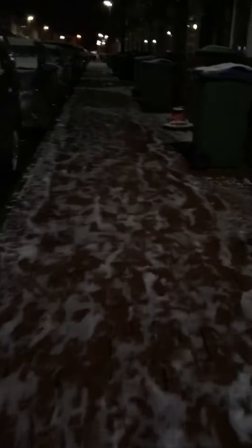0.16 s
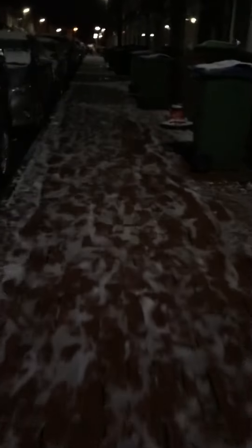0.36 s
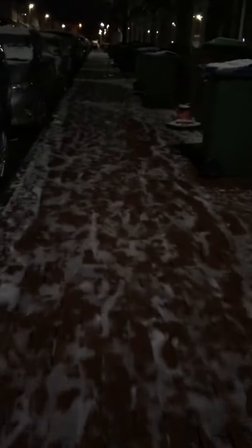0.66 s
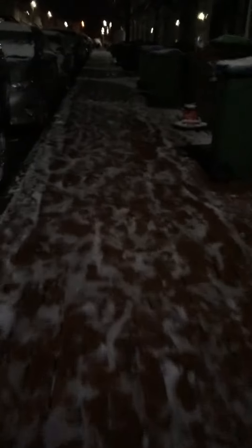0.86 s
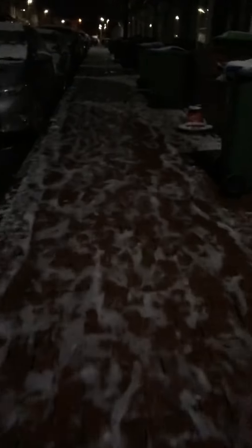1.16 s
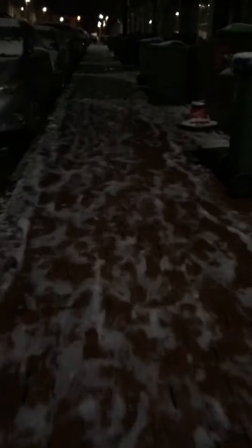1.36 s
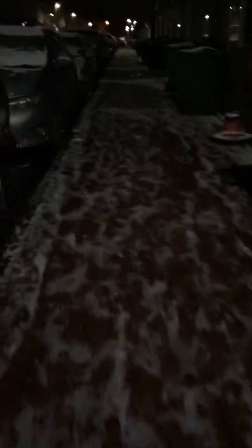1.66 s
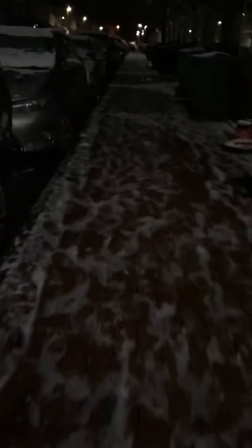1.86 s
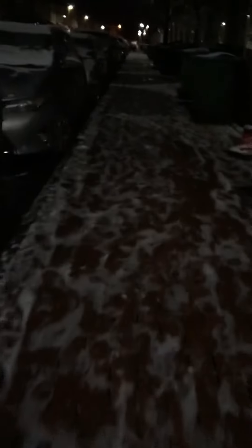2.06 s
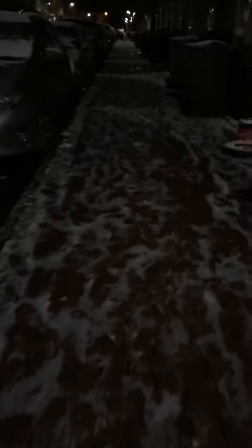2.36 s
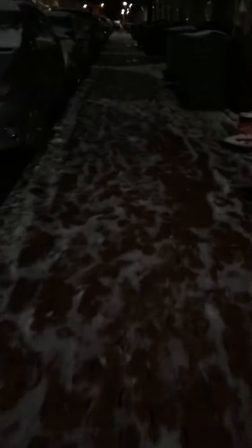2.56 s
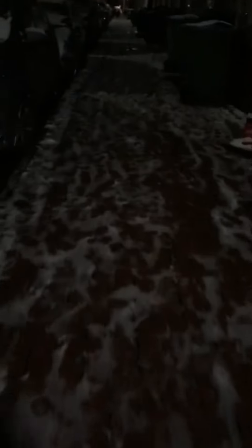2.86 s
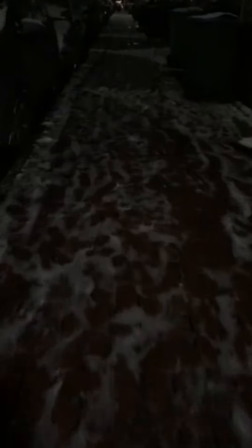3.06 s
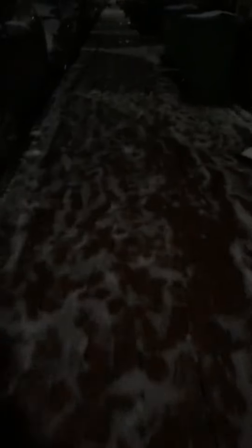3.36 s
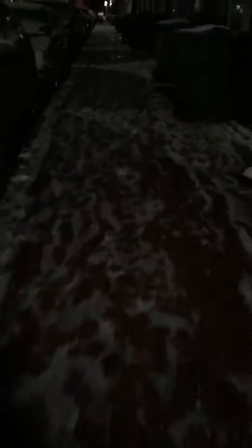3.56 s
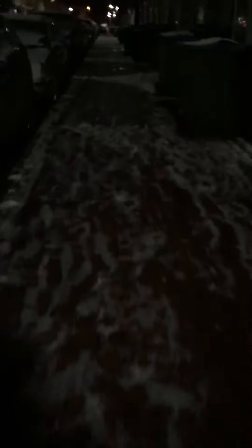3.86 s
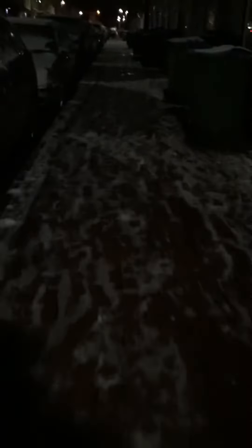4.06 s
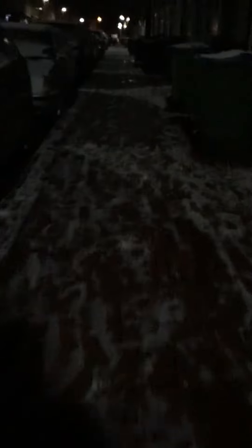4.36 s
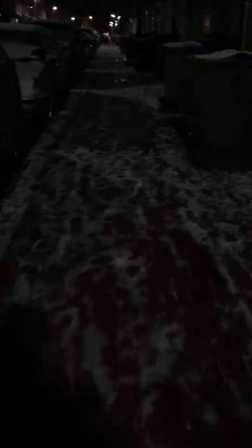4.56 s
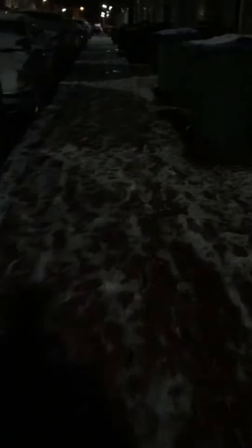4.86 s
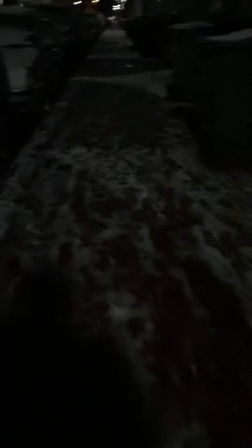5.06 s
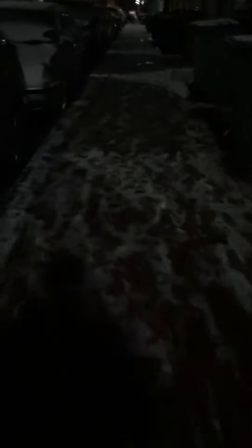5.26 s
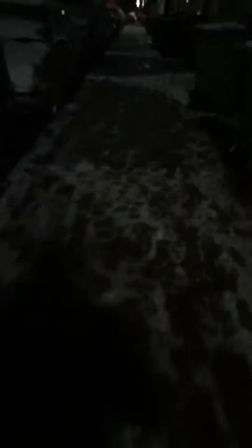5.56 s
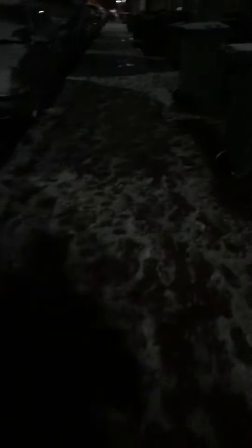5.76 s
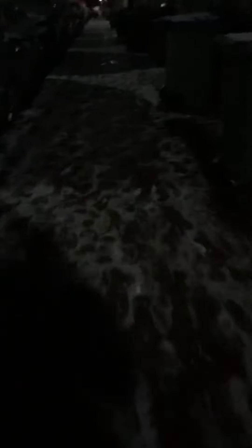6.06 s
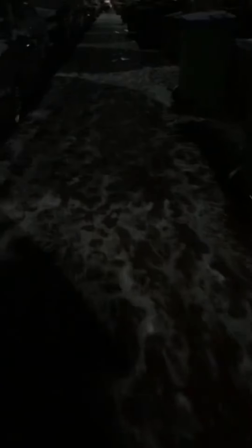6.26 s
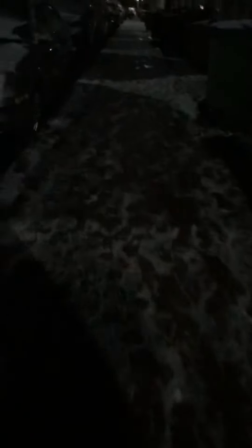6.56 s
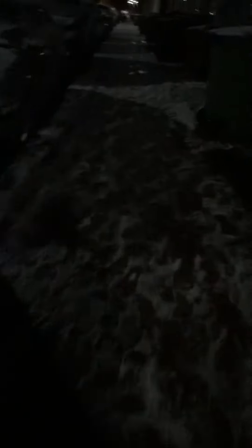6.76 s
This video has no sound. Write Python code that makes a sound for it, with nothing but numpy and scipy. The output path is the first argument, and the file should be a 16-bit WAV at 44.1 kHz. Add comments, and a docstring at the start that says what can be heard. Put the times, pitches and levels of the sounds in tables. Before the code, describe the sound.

Steady footsteps on frozen, trodden snow, about two a second. Each heel breaks the crust in a cluster of dry pops and icy snaps, then the toe grinds lumps and crystals more softly. Some steps squeak briefly. The hand-held phone is close to the walker; a soft bump knocks it early on. A short echo comes off pavement, parked cars and houses, over a very faint low town rumble.

```python
"""Footsteps break frozen, trodden snow over a faint far town rumble and small shifts of the grip on a held
phone. Heel and toe crush lumps and grind ice crystals (filtered random impulses); crust breaks in sharp cracks.
Each crack is a damped pop, an icy snap, a thud and splinters; some steps squeak as stick-slip trains. Pavement,
parked cars and house fronts answer with a quick bounce and a short scattered tail. A few soft low knocks sound,
mostly bumps on the phone, one a heavy heel; the phone's port ripples the treble."""
import sys
import numpy as np
from scipy import signal
from scipy.fft import rfft, irfft, next_fast_len
from scipy.io import wavfile
from scipy.ndimage import map_coordinates

SR = 44100
rng = np.random.default_rng(int(sys.argv[2]) if len(sys.argv) > 2 else 0)


def store_pcm(level_fs):
    """Save levels as 16-bit WAV."""
    pcm = np.round(np.clip(level_fs, -1, 1) * 32767).astype(np.int16)
    wavfile.write(sys.argv[1], SR, np.atleast_2d(pcm).T)


N = 305172
TOP_HZ = 16100  # upper band edge
LEVEL_WINDOW_S = 0.002  # span that defines a short sound's level


def amp(db):
    """Decibels to gain."""
    return 10 ** (np.asarray(db) / 20)


def unit(x):
    """Scale to rms 1."""
    return x / np.sqrt(np.mean(x ** 2) + 1e-20)


def burst(x):
    """Scale short sounds to the energy of one level window at rms 1."""
    energy = np.sum(x ** 2, axis=-1, keepdims=True) + 1e-20
    return x * np.sqrt(LEVEL_WINDOW_S * SR / energy)


def along(points, hz):
    """Interpolate (f/Hz, value) points on a log frequency axis."""
    f, value = np.transpose(points)
    return np.interp(np.log(hz + 1), np.log(f + 1), value)


def coloured(x, spectrum, size=2048):
    """Minimum-phase filter with the given (f/Hz, level/dB) shape: causal, so attacks stay sharp."""
    gain = amp(along(spectrum, np.fft.rfftfreq(size, 1 / SR)))
    cepstrum = irfft(np.log(gain))
    # fold onto positive time
    cepstrum[1:size // 2] *= 2
    cepstrum[size // 2 + 1:] = 0
    impulse = irfft(np.exp(rfft(cepstrum)))
    return signal.fftconvolve(x, impulse)[:len(x)]


def add(track, s, sound):
    """Mix a sound into the track at s seconds."""
    part = track[max(round(s * SR), 0):][:len(sound)]
    part += sound[:len(part)]


def pop(t, hz, cycles):
    """Heavily damped flexing, decay constant in cycles; its change of flow is what radiates."""
    u = np.maximum(t, 0) * hz
    flow = u ** 2 * np.exp(-u / cycles) * np.sin(2 * np.pi * u)
    return burst(np.gradient(flow, axis=-1))


def grains(rate_hz, spread_db, size):
    """Random tiny impulses at a mean rate, a few much larger than the rest."""
    hit = rng.random(size) < rate_hz / SR
    sign = rng.choice([-1, 1], size)
    excess = np.minimum(rng.exponential(size=size), np.pi)
    return hit * sign * amp(spread_db * excess)


# rumble spectrum: f/Hz, relative level/dB per Hz
TOWN_SPECTRUM = [(20, -29), (35, -5), (55, -4), (90, -6), (160, -10.5), (300, -7), (600, -10),
                 (1200, -12.5), (2500, -17.5), (5000, -26.5), (16000, -24.5)]


def town(level_db=-56, sway_rate_hz=5):
    """Distant traffic: low-weighted noise whose level sways smoothly at random."""
    knots_db = rng.standard_normal(N * sway_rate_hz // SR + 4)
    sway_db = 1.2 * map_coordinates(knots_db, [np.arange(N) * sway_rate_hz / SR])
    rumble = unit(coloured(rng.standard_normal(N), TOWN_SPECTRUM, size=16384))
    return amp(level_db + sway_db) * rumble


# soft low knocks, mostly bumps on the phone; the one at 1.868 s is a heavy heel landing: t/s, peak level/dB,
# f/Hz
BUMPS = [(0.7958, -15, 178.6), (1.868, -33, 135), (3.457, -29, 150)]
# transmission through the hand: f/Hz, level/dB
GRIP_RESPONSE = [(30, 6), (300, 2), (600, -8), (1500, -28)]
# small shifts of the grip: f/Hz, relative level/dB per Hz
JOSTLE_SPECTRUM = [(25, -34), (55, 0.5), (110, -1.5), (300, -8.5), (700, -30), (2000, -60)]


def handling(case_hz=66, case_db=-11, jostle_db=-63):
    """A knock is a dull push, then a slower sway of the case; the grip also shifts faintly at random."""
    out = amp(jostle_db) * unit(coloured(grains(12, 3.4, N), JOSTLE_SPECTRUM, size=8192))
    t = np.arange(SR // 8) / SR
    for s, db, hz in BUMPS:
        push = pop(t, hz, cycles=0.19)
        sway = amp(case_db) * pop(t - 0.001, case_hz, cycles=0.31)
        knock = coloured(push + sway, GRIP_RESPONSE)
        add(out, s, amp(db) * knock / np.abs(knock).max())
    return out


def press(t, start_s, attack_s, hold_s, release_s):
    """Weight on the snow, 0-1: exponential onset, hold and release."""
    onset = np.minimum(t - start_s, 0) / attack_s
    release = np.maximum(t - start_s - hold_s, 0) / release_s
    return np.exp(onset - release)


HEEL_ATTACK_S, HEEL_RELEASE_S = 0.015, 0.065
TOE_ATTACK_S, TOE_HOLD_S, TOE_RELEASE_S = 0.07, 0.11, 0.034
RESTING_CRUSH_DB, RESTING_GRIT_DB = -77, -82  # snow under the standing foot
# heel and toe loads, levels before layer trims: heel t/s, heel hold t/s, heel crush level/dB,
# heel grit level/dB, toe t/s, toe crush level/dB, toe grit level/dB
STEPS = [(0.157, .03, -58.5, -55, 0.17, -54, -53), (0.545, 0.07, -38, -44.5, 0.73, -39.5, -50.5),
         (1.299, 0.038, -32, -55, 1.3, -48.5, -52), (1.876, 0.06, -23, -33, 2.24, -43, -64),
         (2.458, 0.02, -30, -45.5, 2.69, -51.5, -61.5), (3.053, 0.052, -29.5, -36.5, 3.34, -36, -50.5),
         (3.533, 0.26, -34.5, -44, 4.96, -36, -60), (4.231, 0.031, -27.5, -47.5, 4.66, -48.5, -63.5),
         (4.814, 0.069, -29, -41.5, 5.15, -45, -56), (5.417, 0.051, -34.5, -42.5, 5.75, -41, -56.5),
         (5.977, 0.026, -25.5, -41.5, 5.72, -42, -49.5), (6.502, 0.11, -28.5, -44, 6.82, -51, -52)]


def footwork(t):
    """Crush and grit levels (dB) at times t: powers of the heel, toe and resting loads add."""
    power = amp([[RESTING_CRUSH_DB], [RESTING_GRIT_DB]]) ** 2
    for heel_s, hold_s, crush_db, grit_db, toe_s, toe_crush_db, toe_grit_db in STEPS:
        heel_weight = press(t, heel_s, HEEL_ATTACK_S, hold_s, HEEL_RELEASE_S)
        toe_weight = press(t, toe_s, TOE_ATTACK_S, TOE_HOLD_S, TOE_RELEASE_S)
        heel = amp([[crush_db], [grit_db]]) * heel_weight
        toe = amp([[toe_crush_db], [toe_grit_db]]) * toe_weight
        power = power + heel ** 2 + toe ** 2
    return 10 * np.log10(power)


# packed lumps: f/Hz, relative level/dB per Hz
LUMP_SPECTRUM = [(90, -39), (200, -22.5), (500, -12), (1000, -1.5), (1700, 1), (3000, -10.5), (5000, -22),
                 (10000, -27)]
# fine ice crystals: f/Hz, relative level/dB per Hz
CRYSTAL_SPECTRUM = [(1200, 9), (3000, 9.5), (5500, 7.5), (9000, 6.5), (13000, 9), (16000, 5)]


def loose_snow(tick_db=7, tick_hz=3300, count=480):
    """The sole grinds packed lumps and fine ice crystals; larger crumbs tick at random."""
    crush_db, grit_db = footwork(np.arange(N) / SR)
    lumps = unit(coloured(grains(1100, 3.2, N), LUMP_SPECTRUM))
    crystals = unit(coloured(grains(2600, 6.2, N), CRYSTAL_SPECTRUM))
    out = amp(crush_db - 8.5) * lumps + amp(grit_db + 0.5) * crystals
    t = np.arange(SR // 100) / SR
    times_s = rng.uniform(0, N / SR, count)
    for when, (size, pitch) in zip(times_s, rng.standard_normal((count, 2))):
        i = int(when * SR)
        pressure_db = (crush_db[i] + grit_db[i]) / 2
        hz = min(tick_hz * np.exp(0.55 * pitch), TOP_HZ)
        add(out, when, amp(pressure_db + tick_db + 1.4 * size) * pop(t, hz, cycles=0.31))
    return out


def varied(spectrum, count=12, humps_sd_db=3):
    """The same broad shape with random humps and dips, as no two pieces of ice are alike."""
    hz = np.geomspace(spectrum[1][0], spectrum[-1][0], count)
    humps_db = humps_sd_db * rng.standard_normal(count)
    return [spectrum[0], *zip(hz, along(spectrum, hz) + humps_db)]


def crackle(envelope, spectrum):
    """A rapid train of micro-cracks under an envelope."""
    train = grains(14000, 6, len(envelope))
    return burst(coloured(train * envelope, spectrum))


def splinters(t, hz, delay_s=0.0055, scatter=0.37, cycles=0.19, count=10):
    """Smaller pieces give way in the milliseconds after a break, each at its own pitch."""
    when = LEVEL_WINDOW_S + delay_s * rng.exponential(size=(count, 1))
    pitch_hz = hz * np.exp(scatter * rng.standard_normal((count, 1)))
    strength = rng.standard_normal((count, 1)) * np.exp(-when / 0.019)
    return burst(np.sum(strength * pop(t - when, pitch_hz, cycles), axis=0))


# ice snap: f/Hz, relative level/dB per Hz
SNAP_SPECTRUM = [(100, -35), (500, -19.5), (1500, 1.5), (3500, 2.5), (6000, -1), (9000, -3.5), (13000, -3),
                 (16000, -9.5)]


def first_tick(t, hz, spread=0.45):
    """A small piece yields under the first weight, shortly before the break."""
    pitch_hz = min(hz * np.exp(spread * rng.standard_normal()), TOP_HZ)
    return pop(t, pitch_hz, cycles=0.14) + 1.6 * crackle(np.exp(-t / 0.0022), SNAP_SPECTRUM)


def small_cracks(pop_db=2.5, snap_db=6, thud_db=-20, splinter_db=-9, scatter_db=3, pitch_hz=2000,
                 pitch_spread=0.39, least_pop_db=-53, least_snap_db=-57, busy_db=-58, idle_share=0.12,
                 count=170):
    """Random lesser breaks, dense and strong under load, sparse and faint between; rows as in CRACKS."""
    t = np.arange(0, N / SR, 0.01)
    load = np.minimum(amp(footwork(t)[1] - busy_db), 1)
    busy = np.cumsum(idle_share + load)
    # invert cumulative activity to get break times
    quantile = (np.arange(count) + rng.random(count)) / count
    when = np.interp(quantile, busy / busy[-1], t)
    size, pitch = rng.standard_normal((count, 2)).T
    load_db = footwork(when) + [[pop_db], [snap_db]]
    floored_db = np.maximum(load_db, [[least_pop_db], [least_snap_db]])
    plate_db, ice_db = floored_db + scatter_db * np.clip(size, -2, 2)
    hz = pitch_hz * np.exp(pitch_spread * pitch)
    return list(zip(when, plate_db, hz, ice_db, plate_db + thud_db, np.full(count, splinter_db)))


WARNING_S, WARNING_DB = 0.014, -22  # tick lead before x0.5-1.2 scatter; gain re mean of pop and snap
# placed breaks: t/s, pop level/dB, pop f/Hz, snap level/dB, thud level/dB before trim,
# splinter level/dB re the break
CRACKS = [(.0164, -41, 1230, -43, -46, -3), (.0624, -29, 1860, -34, -49, -16),
          (0.1403, -10, 2270, -10.5, -32, -27), (0.1519, -15.5, 2050, -24, -35.5, -32),
          (.1648, -38, 2320, -20.5, -41.5, -24.5), (.2112, -12.5, 1305, -21.5, -39, -17),
          (.5663, -8, 1378, -17, -25.5, -3.5), (.679, -46, 3977, -33, -63.5, -13),
          (.693, -16.5, 2520, -30, -39, -16.5), (0.7536, -26, 1300, -47, -31, 3.5),
          (1.0398, -46, 1052, -57, -56, -19.5), (1.107, -47.5, 2390, -52, -70, -2),
          (1.2376, -18.5, 1970, -20.5, -38.5, -4), (1.2764, -8.5, 1570, -31.5, -24.5, 2.5),
          (1.3289, -24.5, 1484, -30.5, -31, 6), (1.3414, -22, 1710, -48, -37, -1),
          (1.4541, -39, 2315, -37.5, -47, -23), (1.483, -3.5, 1633, -31, -31.5, -14.5),
          (1.7032, -61, 2440, -37.5, -53, 5.5), (1.7937, -31, 3590, -31.5, -61.5, -10),
          (1.8086, -14.5, 1457, -24.5, -31, 1), (1.868, -18.5, 2050, -22, -26, 2),
          (1.8884, -10, 2900, -17, -20, -4), (1.9402, -15, 1540, -26, -44, -17),
          (1.955, -8, 1150, -19.5, -34, -3.5), (2.0291, -19, 1380, -33.5, -57, -5.5),
          (2.2201, -26.5, 1632, -33.5, -42.5, -7.5), (2.2575, -43, 2320, -34.5, -50.5, -6),
          (2.2982, -28, 1880, -47, -41, -3.5), (2.394, -12, 2990, -24, -35, -3),
          (2.4511, -32, 2530, -28, -36, -3), (2.467, -16.5, 2370, -23.5, -33, -1),
          (2.4753, -14.5, 2070, -12.5, -42, -1.5), (2.4975, -15.5, 1600, -33, -49, 4),
          (2.5051, -14, 1620, -29, -50, -2.5), (2.5933, -22.5, 3040, -17.5, -66, -4),
          (2.6871, -25, 3820, -26.5, -71.5, -1.5), (2.7314, -24.5, 3750, -26.5, -74.5, -15),
          (2.7903, -25.5, 3640, -30.5, -63, -8.5), (2.8046, -24, 3820, -22, -68, -2.5),
          (2.8256, -25, 3940, -31, -68, 2.5), (2.9341, -42, 2230, -36.5, -48, 4.5),
          (2.9616, -26, 1760, -35.5, -35.5, -4), (2.993, -50, 2130, -26.5, -50.5, -3),
          (3.0352, -16.5, 2150, -19, -36, -2), (3.078, -14, 905, -11, -22, -23),
          (3.0852, -13, 860, -19.5, -41, -1), (3.1271, -31, 3860, -16.5, -38, -14),
          (3.1332, -17, 2640, -13.5, -37, -11), (3.3, -44, 3874, -25.5, -69, -20),
          (3.305, -30, 1450, -41, -53, -16), (3.3197, -33.5, 2684, -27, -58, -10),
          (3.3306, -18, 1555, -26.5, -55, -11), (3.3525, -25.5, 1867, -31, -56, -7),
          (3.3975, -23.5, 1687, -36, -55, -11), (3.4573, -28, 964, -15.5, -46, -8),
          (3.4601, -10.5, 2350, -30, -29, -6.5), (3.5352, -30, 2820, -37.5, -56, 7),
          (3.553, -23, 2230, -28, -38.5, 0), (3.5732, -18, 2390, -31, -57, -15),
          (3.624, -16, 2580, -19, -31.5, 1), (3.6371, -8.5, 1734, -26.5, -28, -8),
          (3.6407, -4, 1820, -14.5, -43, -5), (3.6845, -6.5, 1430, -14, -44, -7),
          (3.6909, -8, 1680, -35, -49, -20), (3.7393, -6.5, 1634, -19.5, -20.5, -1.5),
          (3.7465, -10, 1258, -18.5, -50, -4), (3.8223, -25.5, 2517, -35, -62, -21),
          (3.9571, -46, 4010, -33, -56, -9), (3.9814, -24.5, 1403, -29, -36.5, 1),
          (4.0293, -30, 847, -44.5, -34, 7.5), (4.0846, -26.5, 1240, -33.5, -41, 3),
          (4.1129, -17, 1141, -27.5, -23.5, 0.5), (4.2328, -23, 3000, -23, -29, -3),
          (4.261, -15, 1250, -19.5, -42, 1), (4.3284, -18, 1470, -25.5, -35, 0.5),
          (4.5661, -39, 2000, -54, -55, -6), (4.6902, -32.5, 2133, -45, -59, 0.5),
          (4.785, -24.5, 1510, -35, -39, 6), (4.8204, -23.5, 2018, -31, -42, 4.5),
          (4.8374, -17, 1164, -27, -53.5, -10), (4.852, -19.5, 2100, -35, -47, 0),
          (4.9405, -20, 1670, -28.5, -58, -40), (5.012, -19, 1850, -30.5, -47, -5),
          (5.1337, -33.5, 910, -34.5, -38.5, 5), (5.1612, -21, 2175, -31, -50, -7),
          (5.217, -24, 1890, -34.5, -43, -3), (5.1812, -27, 2970, -25.5, -63, -5),
          (5.4009, -16.5, 1688, -27.5, -30, 0), (5.4202, -14.5, 1350, -30, -37, 3.5),
          (5.4371, -14, 1570, -35, -45, -2), (5.4407, -4.5, 1340, -24.5, -29, -17),
          (5.5393, -18.5, 1360, -18, -29, -9), (5.5777, -8.5, 1643, -22.5, -31, -2),
          (5.7494, -14.5, 1610, -21, -43, -11), (5.8009, -21, 1616, -29, -57, -2),
          (5.8376, -21.5, 3430, -11.5, -27, -11), (5.9756, -11, 2896, -18, -25.5, -1),
          (5.9857, -10, 1990, -12, -26, -12), (5.992, -12, 1920, -18, -26, -2),
          (6.0122, -7, 970, -17.5, -34, -5), (6.0274, -17, 1410, -22.5, -28, -1),
          (6.0769, -43, 830, -21, -28.5, -7), (6.1444, -10, 1230, -14, -26.5, -15),
          (6.312, -16.5, 800, -23.5, -37, 0), (6.318, -14, 1660, -29, -20.5, -4.5),
          (6.36, -21.5, 1380, -26, -24.5, 1.5), (6.384, -15.5, 1420, -23.5, -35, -5.5),
          (6.4289, -10, 1326, -19.5, -31.5, -10), (6.5398, -23, 1845, -23.5, -39.5, -24),
          (6.559, -15, 1855, -32.5, -29.5, 8), (6.5713, -10.5, 1299, -12, -24.5, -3),
          (6.5791, -6, 1096, -15, -24.5, -5.5), (6.635, -18, 1027, -22.5, -36, -2),
          (6.6946, -33.5, 2880, -14, -35, -15.5), (6.7535, -33.5, 1590, -43, -55, 3),
          (6.9011, -42, 3575, -33.5, -60, -6)]
# ground thud: f/Hz, relative level/dB per Hz
THUD_SPECTRUM = [(30, -2.5), (70, -19), (150, -3.5), (300, 3), (450, 2), (800, 4), (2000, -41.5),
                 (8000, -89)]


def crust(shard_hz=6000, lead_db=-15):
    """Each break pops a plate of crust, snaps its ice, thuds on the ground and sheds splinters."""
    out, t = np.zeros(N), np.arange(SR // 20) / SR
    for s, pop_db, hz, snap_db, thud_db, splinter_db in [*CRACKS, *small_cracks()]:
        plate = amp(pop_db) * pop(t, hz, cycles=0.28)
        tint = varied(SNAP_SPECTRUM)
        shard_pitch_hz = min(shard_hz * np.exp(0.4 * rng.standard_normal()), TOP_HZ)
        shard = pop(t, shard_pitch_hz, cycles=0.41)
        ice = amp(snap_db) * (crackle(np.exp(-t / 0.0034), tint) + 0.67 * shard)
        thud = amp(thud_db + 2.5) * crackle(np.exp(-t / 0.0056), THUD_SPECTRUM)
        chips = amp(snap_db + 4.5) * crackle(np.exp(-t / 0.012), tint)
        debris = amp(pop_db) * splinters(t, hz) + chips
        polarity = rng.choice([-1, 1])
        add(out, s, polarity * (plate + ice + thud) + amp(splinter_db) * debris)
        # crust crazes just before it gives way
        crazing = crackle(np.exp(-t[::-1] / 0.0045), SNAP_SPECTRUM)
        add(out, s - len(t) / SR, amp(snap_db + lead_db) * crazing)
        tick_s = s - WARNING_S * rng.uniform(0.5, 1.2)
        tick_db = (pop_db + snap_db) / 2 + WARNING_DB
        add(out, tick_s, amp(tick_db) * first_tick(t, hz))
    return out


# cold-snow squeaks underfoot: t/s, level/dB, f/Hz, decay constant t/s
SQUEAKS = [(0.145, -30, 2250, 0.011), (0.215, -17, 1740, 0.013), (0.697, -21.5, 2640, 0.0062),
           (1.487, -18, 1900, 0.018), (1.938, -8.5, 1672, 0.016), (2.508, -36.5, 1650, 0.013),
           (3.333, -25, 1540, 0.029), (3.4, -24.5, 1590, 0.015), (3.574, -14.5, 2570, 0.0096),
           (3.692, -28, 1720, 0.015), (5.443, -9.5, 1870, 0.011), (5.753, -25, 1630, .016),
           (6.432, -19, 1460, 0.017)]


def squeaks(cycles=0.9, waver=0.08):
    """Packed snow sticks and slips in a quick uneven train, each slip ringing at nearly the same pitch."""
    out, t = np.zeros(N), np.arange(SR // 10) / SR
    for s, db, hz, life_s in SQUEAKS:
        steps = np.cumsum(rng.uniform(0.66, 2, (20, 1)), axis=0)
        when = (steps - steps[0]) * life_s / 8
        pitch_hz = hz * np.exp(waver * rng.standard_normal(when.shape))
        slips = np.exp(-when / life_s) * pop(t - when, pitch_hz, cycles)
        add(out, s, amp(db) * burst(slips.sum(axis=0)))
    return out


# street decay: f/Hz, t60/s
STREET_DECAY = [(150, 0.18), (600, 0.12), (1700, 0.2), (4000, 0.24), (9000, 0.24), (16000, 0.15)]
# wall reflection: f/Hz, relative level/dB
WALL_SPECTRUM = [(150, 4), (280, 3), (650, -2), (1150, -3), (1850, -1.5), (2900, -4.5), (4500, -4),
                 (9000, -5), (16000, 0)]


def street(x, ground_db=-16, ground_delay_s=0.0072, tail_db=-11, count=14):
    """A quick bounce from nearby, then a short scattered tail that changes as the walker moves on."""
    t = np.arange(N) / SR
    wet = np.zeros(N)
    places_s = np.linspace(0, N / SR, count)
    for nearness in np.eye(count):
        hz, age, z = signal.stft(rng.standard_normal(SR // 2), SR, nperseg=256)
        decay_db = -60 * age / along(STREET_DECAY, hz)[:, None]
        fade = amp(along(WALL_SPECTRUM, hz)[:, None] + decay_db)
        tail = signal.istft(z * fade, SR, nperseg=256)[1]
        # soft onset
        tail *= 1 - np.exp(-(np.arange(len(tail)) / SR / 0.0048) ** 2)
        tail /= np.linalg.norm(tail)
        # equal-power crossfade between places
        share = np.interp(t, places_s, nearness)
        near = np.flatnonzero(share)
        echo = signal.fftconvolve(x[near] * np.sqrt(share[near]), tail)
        add(wet, t[near[0]], echo)
    delayed = np.interp(t - ground_delay_s, t, x, left=0)
    # surface loss adds to ground_db
    bounce = coloured(delayed, [(2000, -7.0), (8000, -6.5)])
    return amp(ground_db) * bounce + amp(tail_db) * wet


def scene():
    """Footsteps with their street echo, over the night's background."""
    steps = crust() + squeaks() + loose_snow()
    return (steps + street(steps) + handling() + town())[None]


# phone pickup response: f/Hz, level/dB
PICKUP_RESPONSE = [(20, -12.5), (45, 4), (300, 0), (520, -1.5), (1050, 0), (2200, -4.5), (4000, -3),
                   (4800, -6), (5600, -2.5), (6700, -3.5), (7600, -6), (9000, -3.5), (10500, -8.5),
                   (12000, -4.5)]


def record(dry):
    """The phone's port ripples the treble; peaks clip at full scale and the band ends steeply."""
    x = np.clip(coloured(dry[0], PICKUP_RESPONSE), -1, 1)
    size = next_fast_len(N + SR // 2)
    in_band = np.fft.rfftfreq(size, 1 / SR) < TOP_HZ
    return irfft(rfft(x, size) * in_band, size)[None, :N]


dry = scene()
out = record(dry)
store_pcm(out)
```